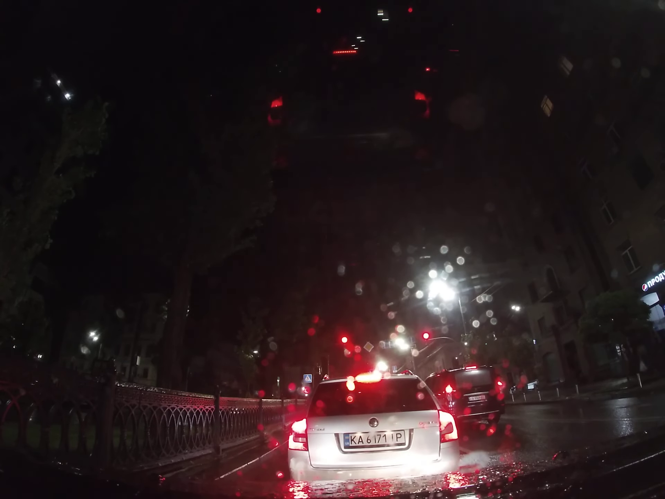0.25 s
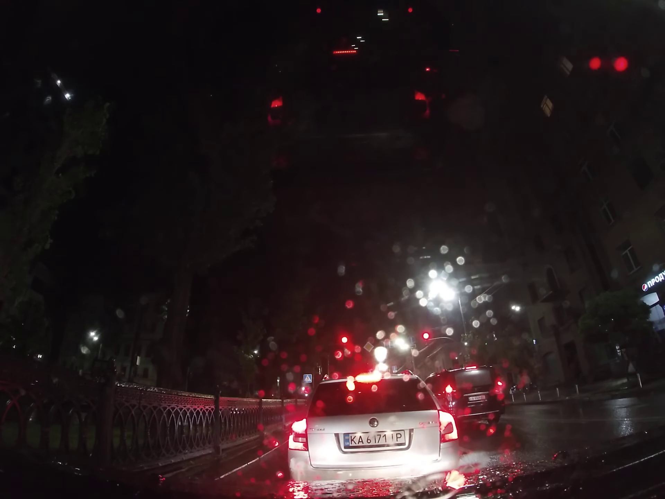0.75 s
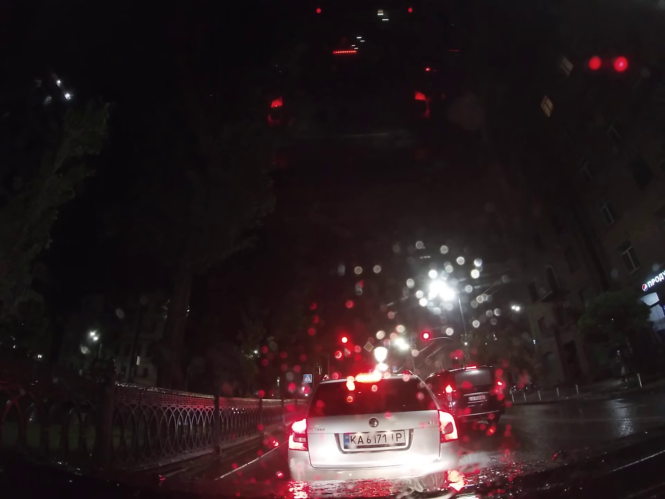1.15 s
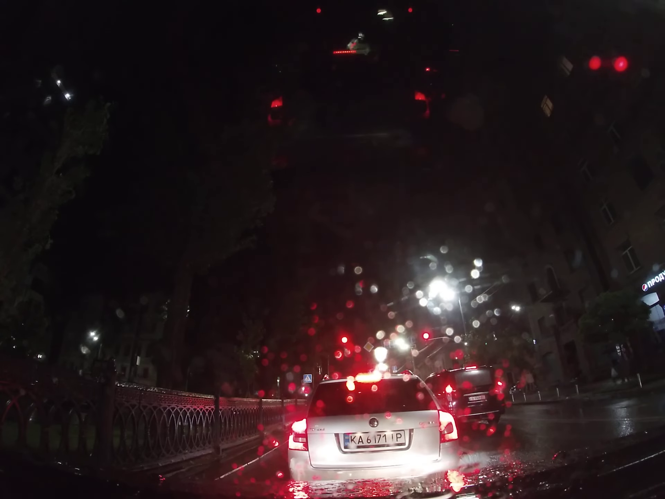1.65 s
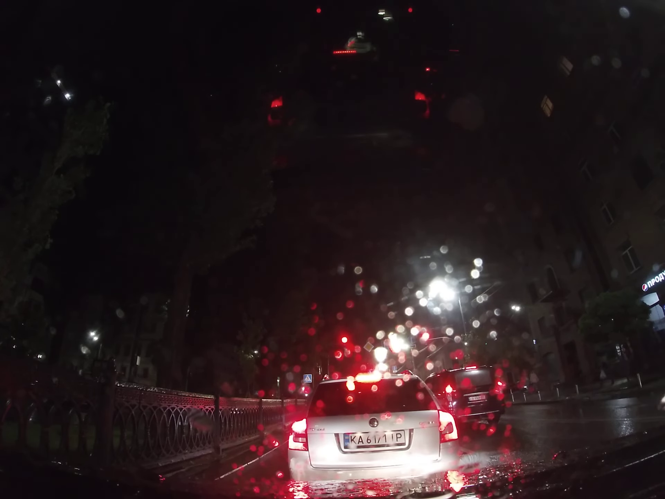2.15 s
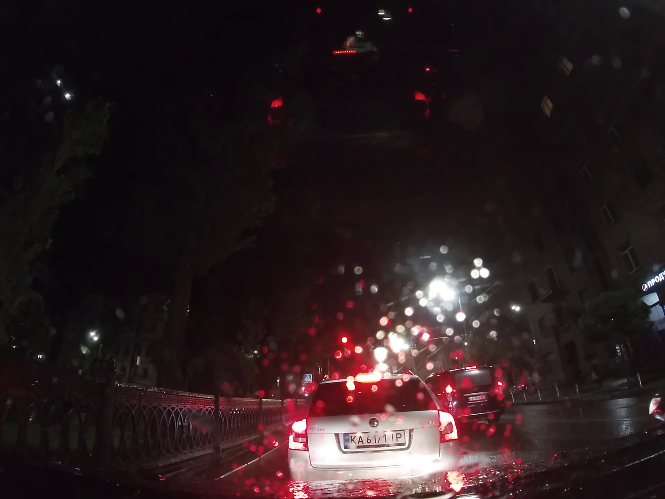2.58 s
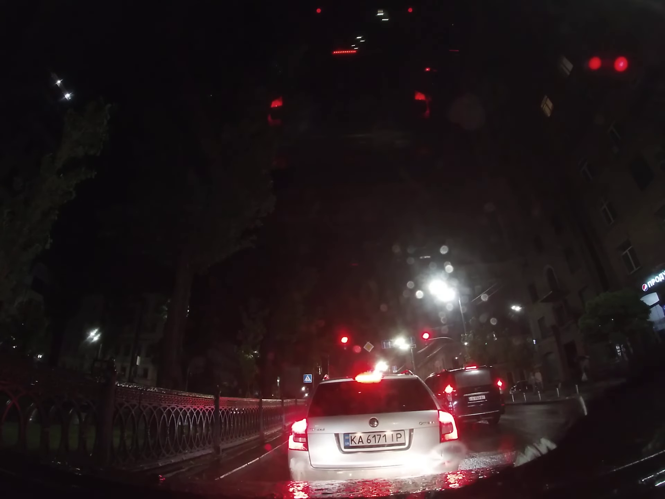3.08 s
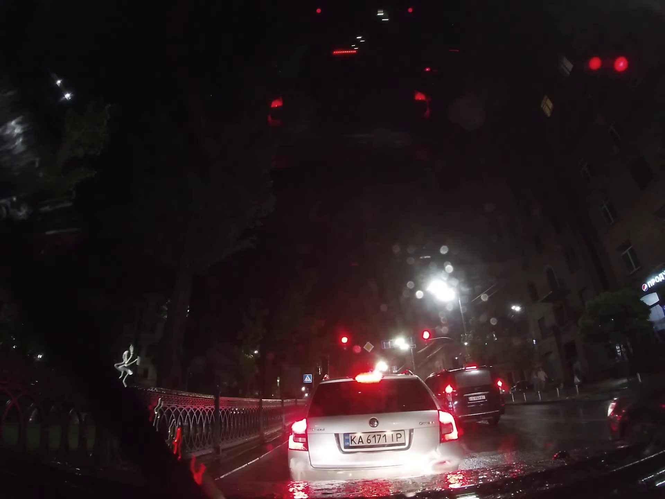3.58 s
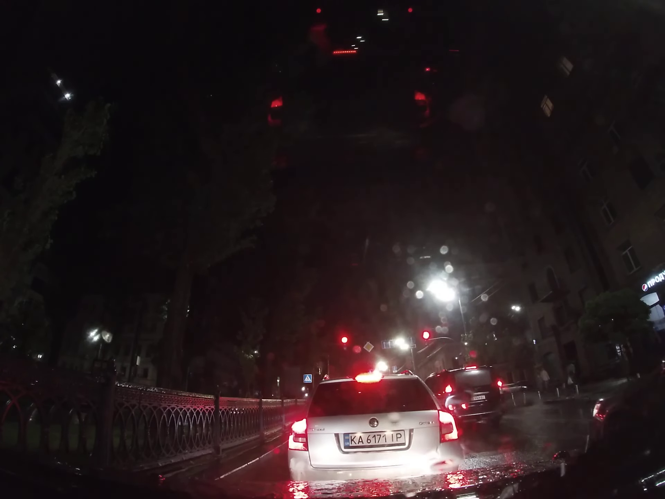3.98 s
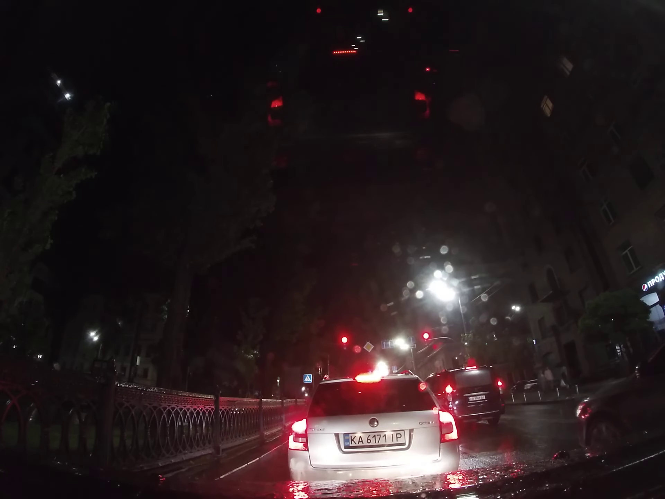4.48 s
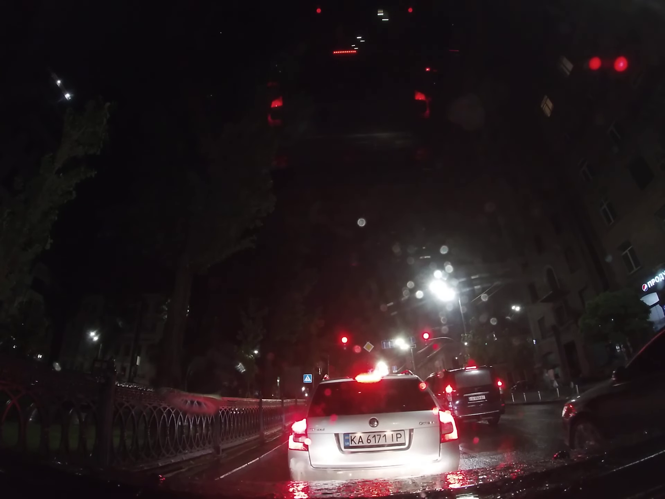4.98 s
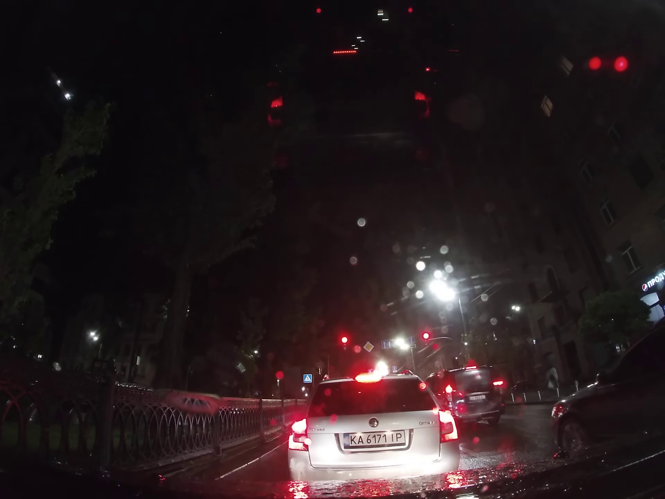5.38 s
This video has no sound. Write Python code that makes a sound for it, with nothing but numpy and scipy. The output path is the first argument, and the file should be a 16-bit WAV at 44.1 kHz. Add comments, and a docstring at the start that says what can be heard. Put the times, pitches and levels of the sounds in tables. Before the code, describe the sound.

Heard from inside a closed car standing in night traffic: a deep, uneven engine idle and bassy rumble dominate. Rain drums softly on the roof and patters on the windscreen, with dry ticks from fat drops close to the microphone. Around three to four seconds a few dull body thumps boom in the cabin; near the end another car's wet tyre noise rises alongside.

```python
"""Inside a car that waits in traffic in the rain. From the start a four-cylinder engine idles as a sum of orders
over a rumble of filtered noise; rain drums on the roof, patters on the windscreen and hisses as spray, all
built from short rings and noise, and a faint high fizz of grains soon fades. Fat drops tick close by as damped taps.
Midway a few dull thumps excite the body modes and the cabin air; towards the end another
car draws up on the wet road, its tyre noise rising as its distance shrinks."""
import sys
import numpy as np
from scipy.fft import rfft, irfft, next_fast_len
from scipy.io import wavfile
from scipy.ndimage import map_coordinates

SR = 44100
rng = np.random.default_rng(int(sys.argv[2]) if len(sys.argv) > 2 else 0)


def store_wav(level_fs):
    """Save 16-bit WAV to argv[1]."""
    pcm = np.round(np.clip(np.atleast_2d(level_fs), -1, 1) * 32767)
    wavfile.write(sys.argv[1], SR, pcm.T.astype(np.int16))


N = 248724

# strength of the rain, as the level on the windscreen before its trim: (time [s], level [dB])
RAIN_STRENGTH = [(0.05, -41.5), (0.67, -42.5), (2.07, -40), (2.63, -42), (3.59, -41), (4.71, -43),
                 (5.5, -42.5)]


def amp(db):
    """Level to amplitude: 20 dB are a factor of ten."""
    return 10 ** (np.asarray(db) / 20)


def unit(x):
    """Normalisation to an rms of 1, so that a later gain sets the level."""
    return x / np.sqrt(np.mean(x ** 2) + 1e-20)


def swell(u):
    """Contact pulse: the force rises to 1 at u = 1 and dies away."""
    return u * np.exp(1 - u)


def curves(rows):
    """Linear interpolation: one value per sample for each column after the time."""
    times, *columns = np.transpose(rows)
    return [np.interp(np.arange(N) / SR, times, column) for column in columns]


def wobble(rate):
    """Slow random modulation: a smooth curve through normal deviates, rate knots a second."""
    knots = rng.standard_normal(int(N * rate / SR) + 4)
    return map_coordinates(knots, [np.arange(N) * rate / SR])


def filtered(x, response):
    """Linear filtering: the spectrum of x times a complex response of frequency."""
    size = next_fast_len(N + SR // 2)
    return irfft(rfft(x, size) * response(np.fft.rfftfreq(size, 1 / SR)), size)[:N]


def colour(x, points):
    """Minimum-phase filter through (frequency [Hz], gain [dB]) points: impacts keep their sharp front."""
    def response(hz):
        f, db = np.transpose(points)
        gain_db = np.interp(np.log(hz + 1), np.log(f), db)
        # folding the cepstrum onto positive times makes the filter causal
        cepstrum = irfft(np.log(amp(gain_db)))
        cepstrum[1:len(cepstrum) // 2] *= 2
        cepstrum[len(cepstrum) // 2 + 1:] = 0
        return np.exp(rfft(cepstrum))
    return filtered(x, response)


def resonance(f, hz, width):
    """Response of one damped mode, 1 at its centre."""
    return 1j * f * width / (hz * hz - f * f + 1j * f * width)


def ringing(x, modes):
    """Modal superposition: x plus the answer of (centre [Hz], width [Hz], gain [dB]) modes; rms 1."""
    def response(f):
        return 1 + sum(amp(db) * resonance(f, hz, width) for hz, width, db in modes)
    return unit(filtered(x, response))


def burst(hz, width, t60, length):
    """Narrow-band noise: a dying noise passes one resonance twice; peak 1."""
    t, f = np.arange(length) / SR, np.fft.rfftfreq(length, 1 / SR)
    noise = rng.standard_normal(length) * amp(-60 * t / t60)
    ring = irfft(rfft(noise) * resonance(f, hz, width) ** 2, length)
    return ring / np.abs(ring).max()


def shower(rate, centre_hz, spread, cycles, size_db):
    """Random impacts, rate a second: each a brief damped ring with its own pitch and size; rms 1.

    spread: octaves either side of the centre; cycles: decay constant; size_db: scale of the random level.
    """
    when, pitch, size, phase = rng.random((int(rate * N / SR), 4)).T[:, :, None]
    k = np.arange(256)  # samples of each ring
    hz = np.minimum(centre_hz * 2 ** (spread * (2 * pitch - 1)), SR / 2)
    turns = hz * k / SR
    gain = amp(-size_db * np.log(np.maximum(1 - size, .02)))  # few large drops, many small
    rings = gain * np.exp(-turns / cycles) * np.sin(2 * np.pi * (turns + phase))
    places = (when * N).astype(int) + k
    return unit(np.bincount(places.ravel(), rings.ravel(), N)[:N])


def engine():
    """Harmonic synthesis: the idle is a sum of orders, the higher ones less steady than the firing rate."""
    # idle: (time [s], firing rate [Hz], level [dB])
    idle = [(0, 22.3, -25.5), (.55, 24, -24), (.95, 25.3, -28.5), (1.2, 25.5, -23.5), (1.85, 21.2, -29),
            (2.55, 22.3, -23), (3.5, 21.6, -28), (4.2, 25, -23), (4.85, 25.1, -24.5), (5.2, 25, -22.5),
            (5.42, 25, -30), (5.64, 24.5, -26.5)]
    # engine orders: (multiple of the firing rate, relative level [dB])
    orders = [(1, 4), (2, -4), (3, -23.5), (4, -22)]
    wander_db, hunt_hz = 1.5, 0.16  # scales of the random drift in level and in speed
    firing_hz, level_db = curves(idle)
    turns = np.cumsum(firing_hz + hunt_hz * wobble(5)) / SR
    throb = np.zeros(N)
    for order, db in orders:
        gain = amp(db + 1.48 * order * wobble(12))
        throb += gain * np.cos(2 * np.pi * order * turns)
    return amp(level_db + wander_db * wobble(3.98)) * throb


def roof():
    """Forced panel vibration: rain drums on the lined roof, whose panel rings at a few low pitches."""
    # the drumming comes in flurries: (time [s], level [dB])
    drumming = [(0, -33.5), (.75, -33), (1.1, -32), (1.5, -33), (1.9, -34), (2.12, -31.5), (2.35, -34),
                (2.8, -33), (3.2, -34), (3.95, -35.5), (4.35, -36), (4.5, -33.5), (4.75, -35.5),
                (5.15, -33.5), (5.64, -34.5)]
    # spectrum of the blows: (frequency [Hz], gain [dB])
    blow_spectrum = [(100, -39), (220, -9), (340, -2.5), (520, -3), (720, -3.5), (900, -8), (1200, -22),
                     (2000, -37.5), (5000, -80.5)]
    # roof panel and cabin resonances: (centre [Hz], width [Hz], gain [dB])
    panel_modes = [(341, 44, -4.5), (463, 34, 2), (594.5, 27, -2.5), (854, 55, -6.5)]
    drops = shower(rate=2200, centre_hz=707, spread=1.35, cycles=0.49, size_db=0.86)
    blows = drops + rng.standard_normal(N)
    level_db, = curves(drumming)
    return amp(level_db + 0.2 * wobble(4.6)) * ringing(colour(blows, blow_spectrum), panel_modes)


def windscreen():
    """Dense impacts merge into noise: distinct drops patter on the glass over the wash of the distant ones."""
    # spectrum on the glass: (frequency [Hz], gain [dB])
    glass_spectrum = [(400, -18), (900, 1.5), (1300, 1.5), (1600, 2), (2100, -3), (3000, -5.5), (3700, -9),
                      (4100, -18), (5500, -21.5), (7000, -34.5), (10000, -72)]
    # windscreen resonances: (centre [Hz], width [Hz], gain [dB])
    pane_modes = [(981, 20, 1.5), (1149, 91, -2), (1816, 280, -12), (2240, 120, -8), (2950, 170, -7),
                  (3260, 120, -15.5), (3740, 180, -12.5)]
    trim_db = -0.05
    drops = shower(rate=420, centre_hz=2520, spread=1.0, cycles=0.59, size_db=1.2)
    patter = unit(colour(drops, glass_spectrum))
    wash = unit(colour(rng.standard_normal(N), glass_spectrum))
    level_db, = curves(RAIN_STRENGTH)
    gain = amp(level_db + trim_db + 0.25 * wobble(16))
    return gain * ringing(amp(-5.0) * patter + wash, pane_modes)


def fat_drops():
    """Damped impact: each large drop gives the glass a dry tap; a faint narrow-band splatter follows."""
    # drops, levels ahead of the glass filter:
    # (time [s], tap level [dB], pitch [Hz], contact [s], splatter level [dB], splatter decay to -60 dB [s])
    drops = [(.2012, -29, 2000, .0004, -40, .02), (.2827, -25.5, 2500, .0002, -37, .03),
             (0.303, -25, 1600, 0.00043, -40, .02), (.3314, -36, 2900, .0003, -32.5, .045),
             (.5738, -28.5, 1570, 0.00079, -36, .03), (.7834, -37, 2000, 0.00055, -42, .02),
             (.9839, -24, 2950, 0.00028, -34, .025), (1.0073, -33.5, 2900, .0004, -42, .02),
             (1.1379, -32, 3600, .0002, -41, .02), (1.1468, -28, 2400, .0002, -40, .02),
             (1.212, -20.5, 2050, .00023, -31, .035), (1.418, -28.5, 2300, .0003, -34, .025),
             (1.639, -34, 1750, .0005, -39, .03), (1.8969, -33, 1700, .0008, -31, .03),
             (1.901, -27, 2600, 0.00022, -42, .02), (2.148, -24, 1900, 0.00025, -31, 0.028),
             (2.3, -30, 1580, .0004, -41, .02), (2.3568, -29, 3000, .0003, -40, 0.017),
             (2.4603, -28, 3500, .00015, -44, .015), (2.8573, -22.5, 1900, 0.00016, -42, .015),
             (2.8857, -33, 1500, .0004, -36, .03), (3.503, -29, 1700, .0004, -39, .02),
             (3.5593, -24, 1550, 0.00051, -34, .036), (3.7087, -32, 1700, .0004, -38, .02),
             (3.9841, -21.5, 1750, .00028, -32, .05), (4.12, -35, 1810, .0005, -37, .035),
             (4.2545, -31.5, 2300, .0012, -31.5, .05), (4.2645, -33, 1850, .0006, -33, .07),
             (4.4243, -34, 1660, .0005, -37, 0.028), (5.0078, -32.5, 1800, .0006, -40, .02)]
    # what the glass passes: (frequency [Hz], gain [dB])
    glass_filter = [(300, -12), (900, -3.5), (3700, 0), (4300, -2.5), (5600, -15), (7000, -27.5),
                    (9500, -38.5), (13000, -58)]
    splatter_rise_s, splatter_width = 0.0017, .9  # width as a share of the pitch
    out, t = np.zeros(N + SR), np.arange(SR // 10) / SR
    for s, db, hz, contact, splatter_db, t60 in drops:
        tap = swell(t / contact) * np.sin(2 * np.pi * hz * t)
        splatter = burst(hz, splatter_width * hz, t60, len(t))
        splatter = splatter * (1 - np.exp(-t / splatter_rise_s))
        out[round(s * SR):][:len(t)] += amp(db) * tap + amp(splatter_db) * splatter
    return colour(out[:N], glass_filter)


def thumps():
    """Modal excitation: a soft blow swings, the body shudders and rings low, then the cabin air booms."""
    # dull thumps on the body, levels ahead of the trim's filter:
    # (time [s], blow level [dB], first pitch [Hz], rise [s], shudder level [dB], boom level [dB], boom delay [s])
    blows = [(2.9731, -14, 350, 0.0034, -32, -16.5, 0.013), (2.993, -15, 180, 0.0029, -35, -17.5, 0.0082),
             (3.5, -18.5, 175, 0.0033, -34, -32, 0.017), (3.6959, -4.5, 186, 0.0018, -20, -16, 0.026),
             (3.836, -25.5, 352, 0.0055, -36, -36, 0.014)]
    # shudder of the body: (frequency [Hz], relative level [dB], decay to -60 dB [s])
    body_modes = [(115, -3, 0.36), (170, -0.5, 0.64), (253.8, 0, 0.26), (334, -1, .15), (433, -7, 0.11)]
    ring_hz, ring_db, ring_t60_s = 155, -5, 1.2  # one panel rings on; level relative to the shudder's
    shudder_rise_s = .007  # the shudder spreads through the body
    sag_s = 0.052  # fall of the pitch: bending waves bring the high pitches first
    out, t = np.zeros(N + SR), np.arange(SR // 2) / SR
    ring = amp(ring_db - 60 * t / ring_t60_s) * np.sin(2 * np.pi * ring_hz * t)
    ring = ring * (1 - np.exp(-t / 0.018))
    for s, db, hz, rise, shudder_db, boom_db, delay in blows:
        turns = hz * sag_s * (1 - np.exp(-t / sag_s))
        blow = -swell(t / rise) * np.sin(2 * np.pi * turns)
        shudder = sum(amp(level) * burst(mode, 0.32 * mode, t60, len(t)) for mode, level, t60 in body_modes)
        shudder = shudder * (1 - np.exp(-t / shudder_rise_s))
        late = np.maximum(t - delay, 0)
        boom = swell(late / 0.026) ** 2 * np.sin(2 * np.pi * 49 * late)
        thump = amp(db) * blow + amp(shudder_db) * (shudder + ring) + amp(boom_db) * boom
        out[round(s * SR):][:len(t)] += thump
    return colour(out[:N], [(600, -1.0), (1500, -20.0), (6000, -52)])  # the trim muffles the blow


def road():
    """Sound transmission: of the traffic rumble only the bass passes the closed doors."""
    # level of the rumble: (time [s], level [dB])
    road_level = [(0, -28.5), (.8, -28), (1.5, -26.5), (2, -28), (3, -27.5), (4.2, -26.5), (4.9, -29),
                  (5.64, -27.5)]
    # its spectrum: (frequency [Hz], gain [dB])
    rumble_spectrum = [(15, -13.5), (32, -5), (55, 2), (68, 2), (85, -2.5), (125, -3.5), (165, -5.5),
                       (205, -7), (290, -15), (450, -29.5), (900, -42.5), (2000, -100)]
    drift_db = 0.44  # scale of the random drift
    level_db, = curves(road_level)
    rumble = unit(colour(rng.standard_normal(N), rumble_spectrum))
    return amp(level_db + drift_db * wobble(8)) * rumble


def neighbour():
    """Spherical spreading: a car brakes evenly towards a stop alongside, its tyre noise growing as 1/distance."""
    # its tyres on the wet road, through the closed windows: (frequency [Hz], gain [dB])
    tyre_spectrum = [(200, -28.5), (300, -1.5), (350, 6), (420, -4.5), (800, -23), (2000, -32),
                     (2900, -22.5), (4200, -30.5), (5600, -35), (7500, -49), (13000, -72.5)]
    # it would halt just after the scene ends; the level is the one fully alongside
    stop_s, brake_m_per_s2, gap_m, level_db = 5.92, 5.6, 1.3, -34.5
    t = np.arange(N) / SR
    behind_m = brake_m_per_s2 * np.maximum(stop_s - t, 0) ** 2 / 2
    nearness = gap_m / np.hypot(gap_m, behind_m)
    return amp(level_db) * nearness * unit(colour(rng.standard_normal(N), tyre_spectrum))


def rain_swell_db():
    """Relative level: how far the rain is above or below its mean strength."""
    level_db, = curves(RAIN_STRENGTH)
    return level_db - level_db.mean()


def spray():
    """Shaped noise and resonant taps: drops burst into fine spray, with tiny high pings among it."""
    # spectrum of the hiss: (frequency [Hz], gain [dB])
    hiss_spectrum = [(2000, -17), (3800, 0.5), (4700, 0.5), (5650, -4.5), (6400, -13.5), (7400, -15.5),
                     (8200, -21), (9000, -22.5), (9500, -21), (10100, -29.5), (12500, -37), (13500, -48.5)]
    mean_db, follows = -57, .6  # level of the hiss at mean rain; share of the rain's swells that it follows
    splashes = shower(rate=1200, centre_hz=6500, spread=0.96, cycles=0.65, size_db=3.5)
    hiss = unit(colour(amp(-7.0) * splashes + rng.standard_normal(N), hiss_spectrum))
    taps = shower(rate=67, centre_hz=9480, spread=.1, cycles=0.94, size_db=4.5)
    pings = unit(filtered(taps, lambda f: resonance(f, hz=9480, width=420) ** 2))
    gain = amp(mean_db + follows * rain_swell_db() + 0.27 * wobble(16))
    return gain * (hiss + amp(-31.0) * pings)


def fizz():
    """Granular noise: a faint high fizz of many short rings holds for a moment and fades."""
    # spectrum of the fizz: (frequency [Hz], gain [dB])
    fizz_spectrum = [(4000, -14), (7500, -3), (10000, -7.5), (11500, -7), (14000, -17.5)]
    level_db, end_s, fade_s = -78, .57, .05
    grains = shower(rate=900, centre_hz=9000, spread=.6, cycles=.6, size_db=0.5)
    hold = (1 - np.tanh((np.arange(N) / SR - end_s) / fade_s)) / 2
    return amp(level_db) * hold * unit(colour(grains, fizz_spectrum))


def scene():
    """Superposition: the pressures of all sources behind the windscreen add."""
    car = engine() + thumps()
    rain = roof() + windscreen() + fat_drops() + spray()
    surroundings = road() + neighbour() + fizz()
    return (car + rain + surroundings)[None]


def record(dry):
    """Band limitation: an ideal low-pass keeps nothing from 14.7 kHz up."""
    top_hz = 14700
    return filtered(dry[0], lambda hz: hz < top_hz)[None]


dry = scene()
out = record(dry)
store_wav(out)
```